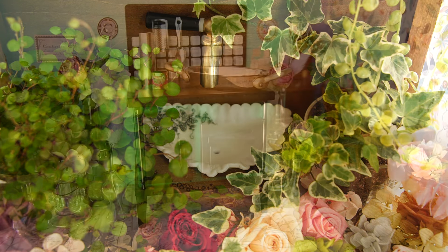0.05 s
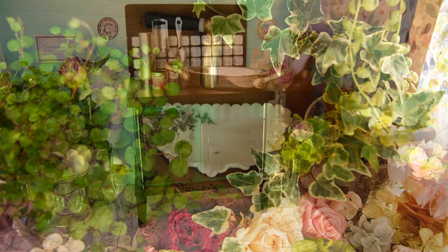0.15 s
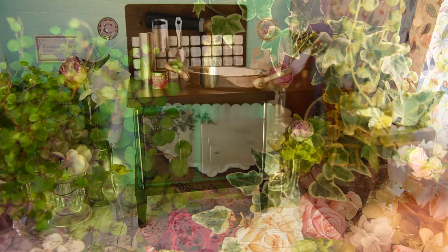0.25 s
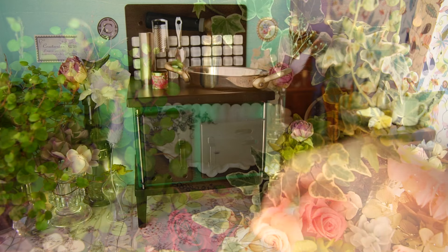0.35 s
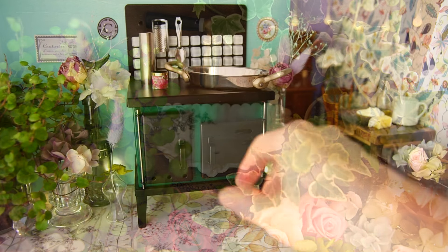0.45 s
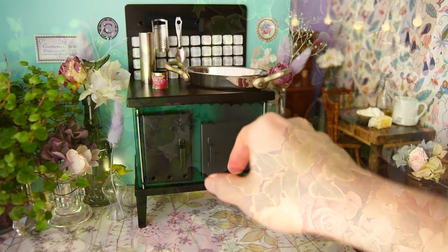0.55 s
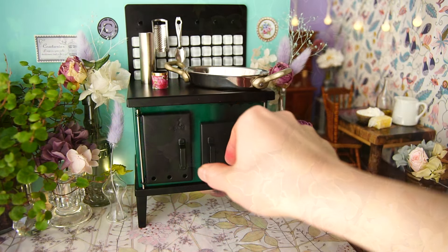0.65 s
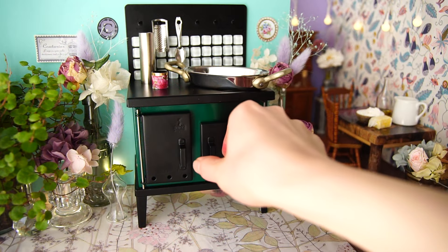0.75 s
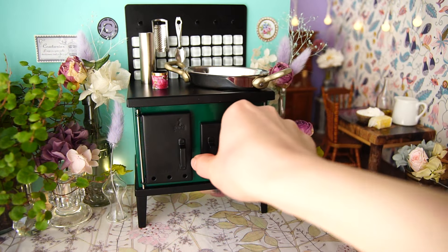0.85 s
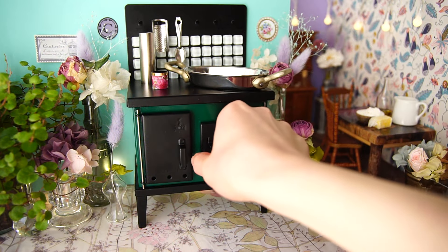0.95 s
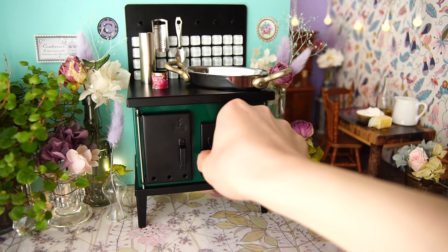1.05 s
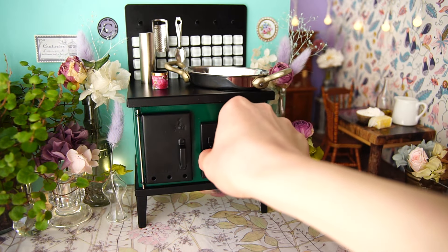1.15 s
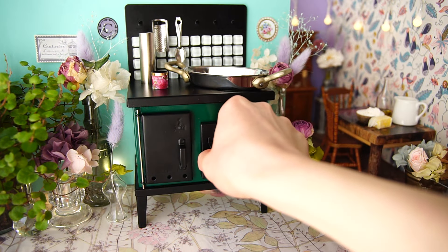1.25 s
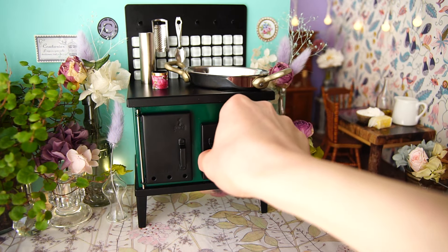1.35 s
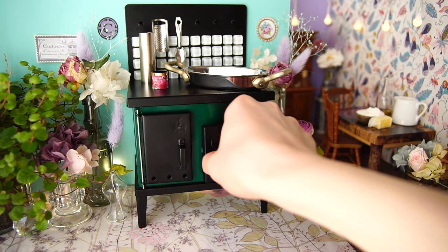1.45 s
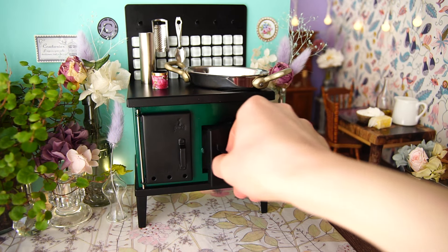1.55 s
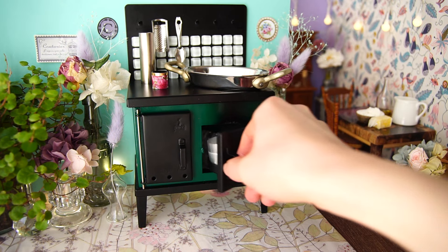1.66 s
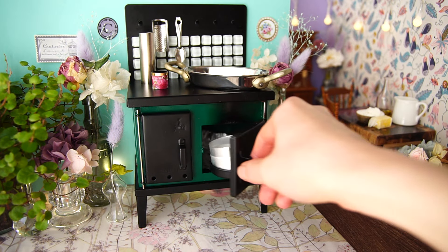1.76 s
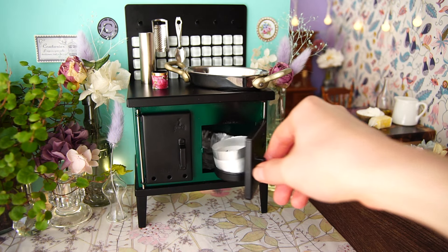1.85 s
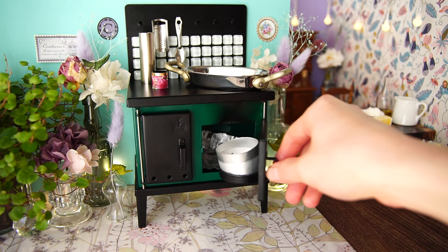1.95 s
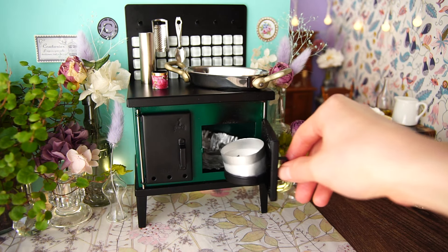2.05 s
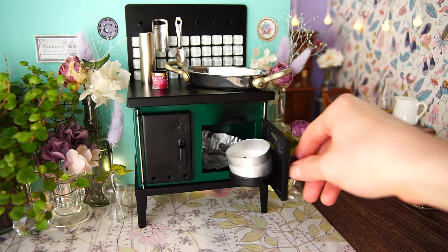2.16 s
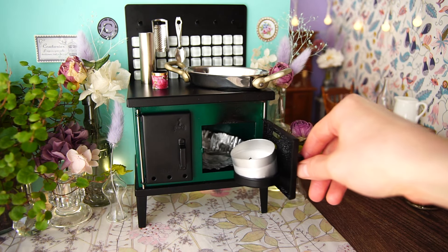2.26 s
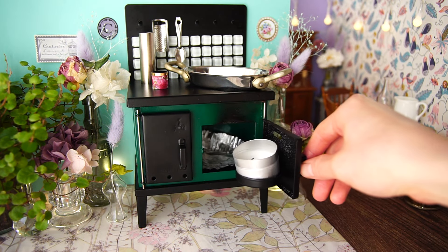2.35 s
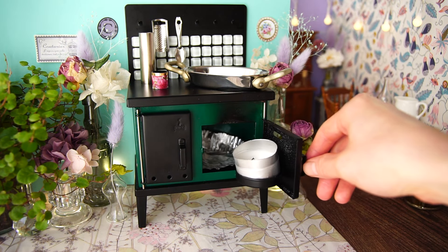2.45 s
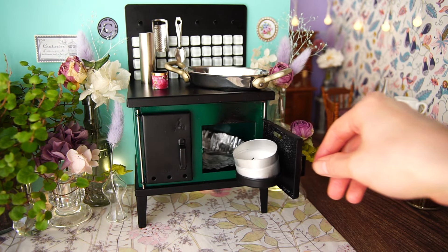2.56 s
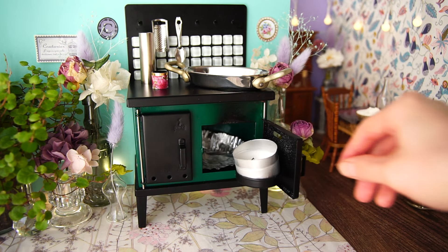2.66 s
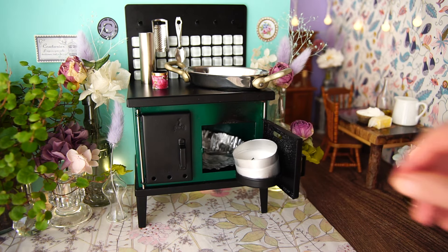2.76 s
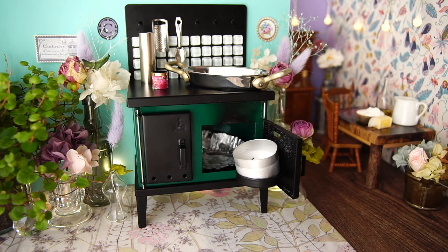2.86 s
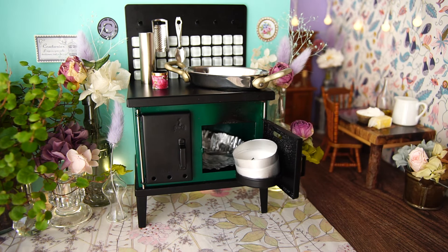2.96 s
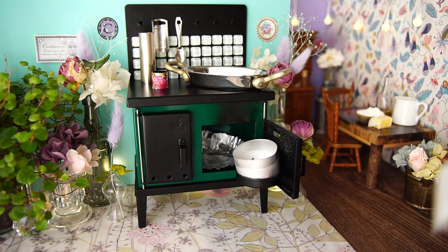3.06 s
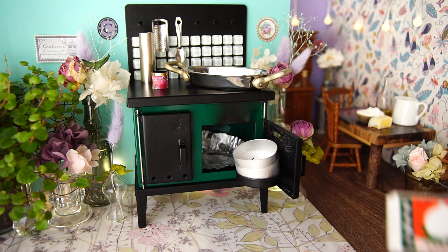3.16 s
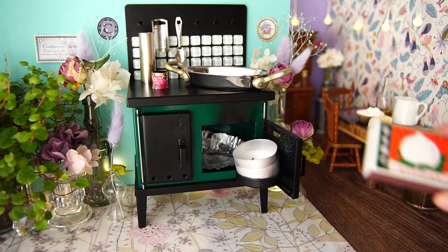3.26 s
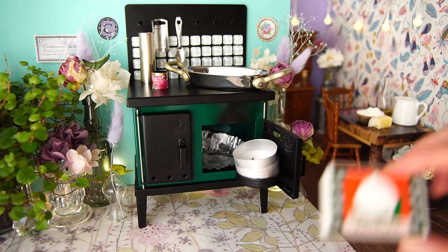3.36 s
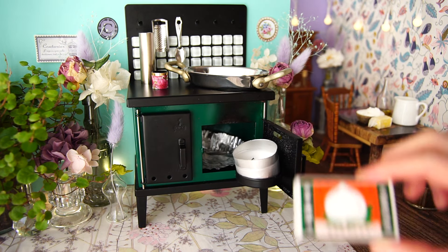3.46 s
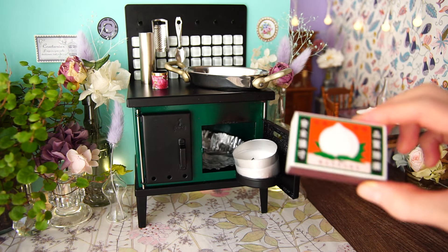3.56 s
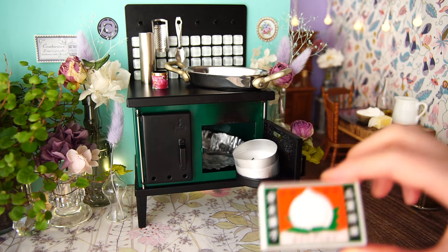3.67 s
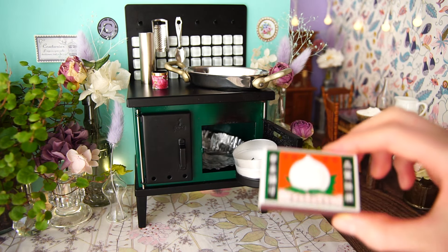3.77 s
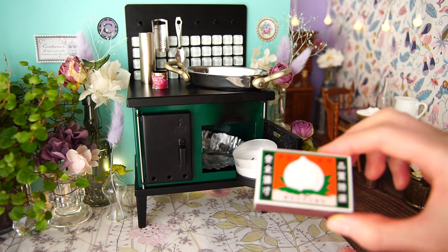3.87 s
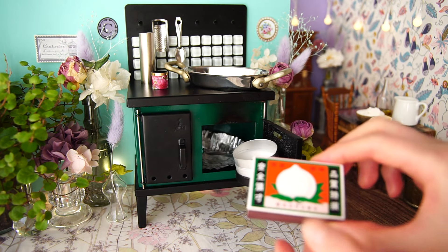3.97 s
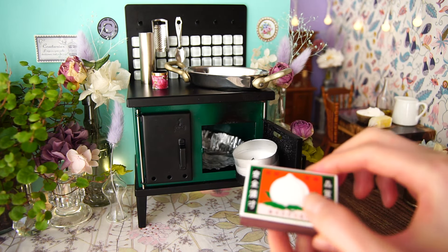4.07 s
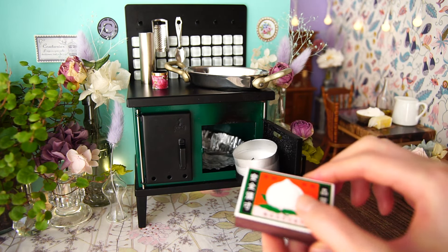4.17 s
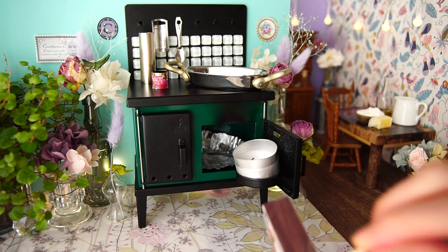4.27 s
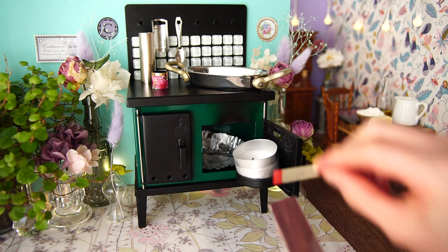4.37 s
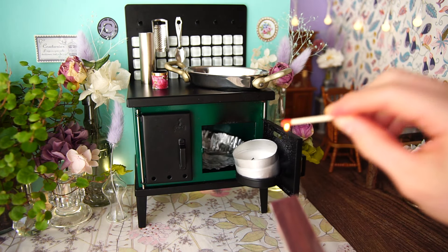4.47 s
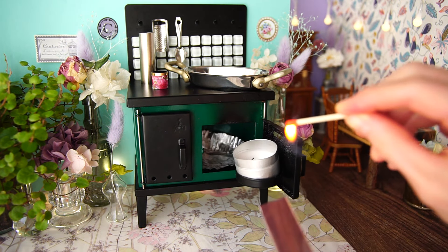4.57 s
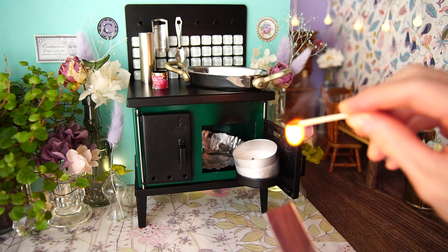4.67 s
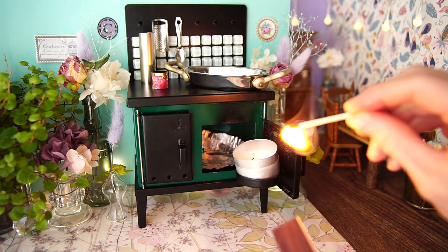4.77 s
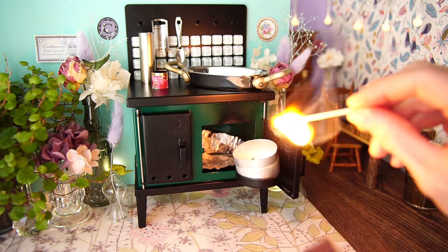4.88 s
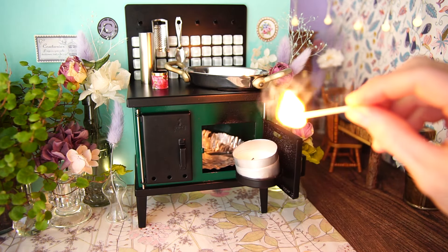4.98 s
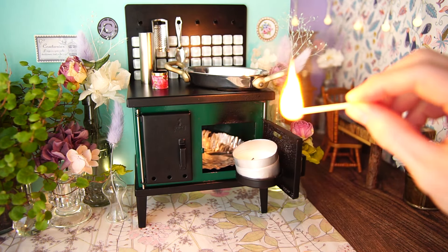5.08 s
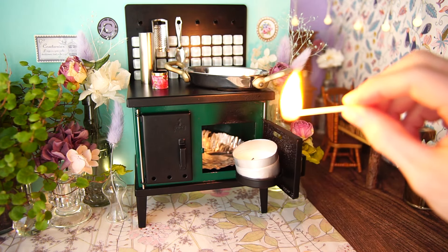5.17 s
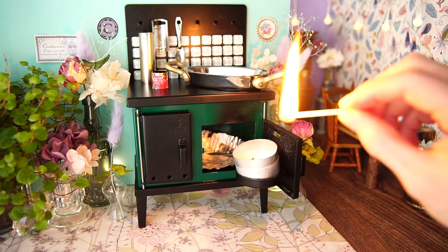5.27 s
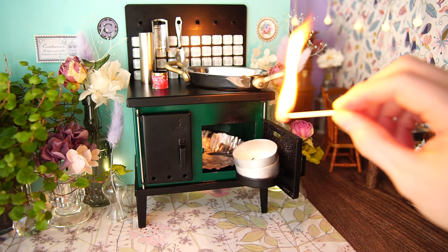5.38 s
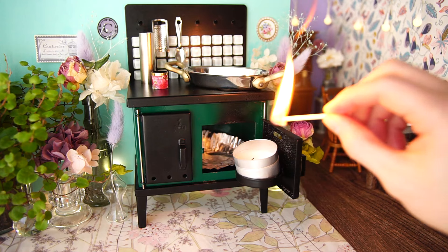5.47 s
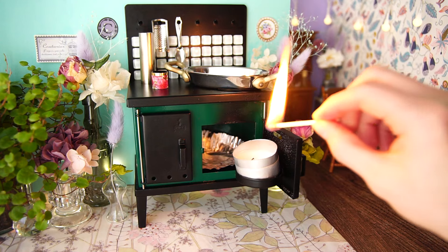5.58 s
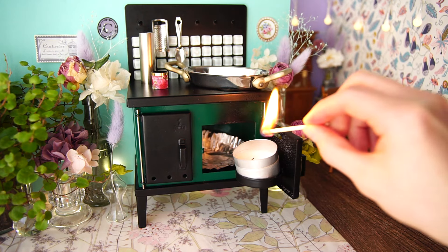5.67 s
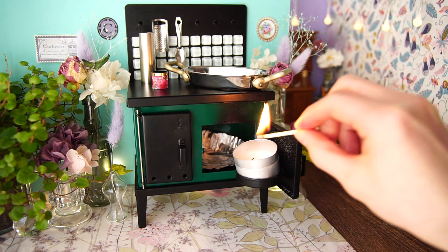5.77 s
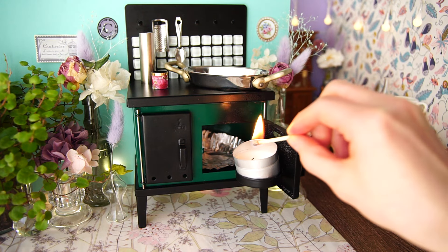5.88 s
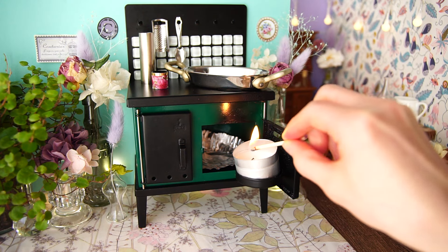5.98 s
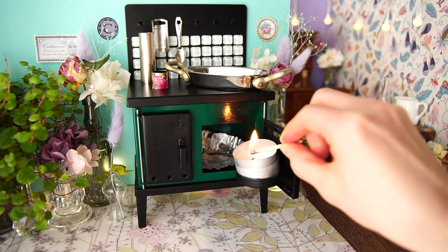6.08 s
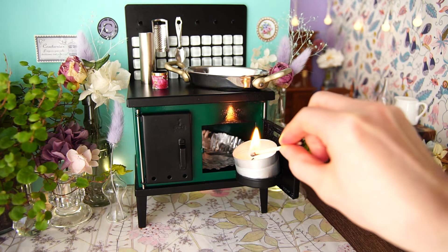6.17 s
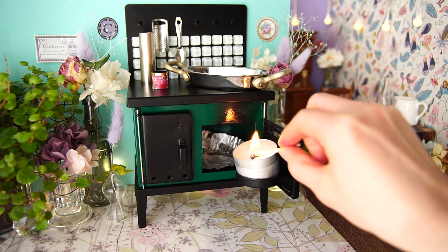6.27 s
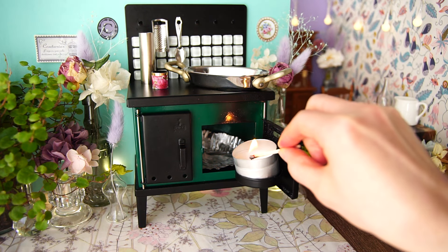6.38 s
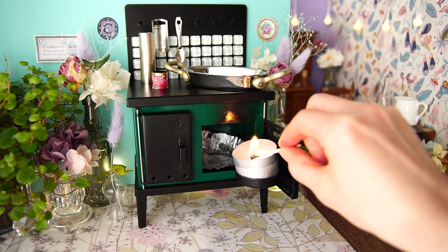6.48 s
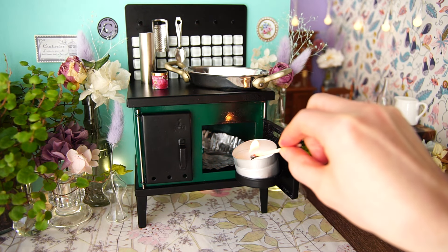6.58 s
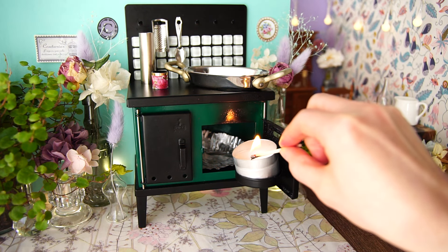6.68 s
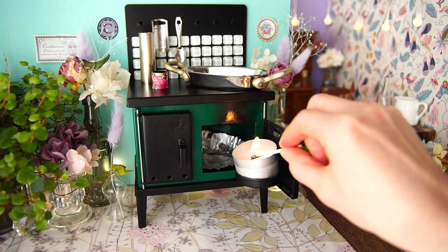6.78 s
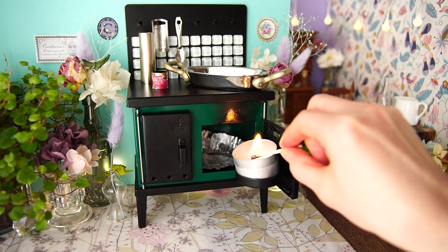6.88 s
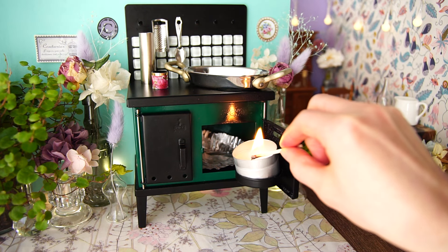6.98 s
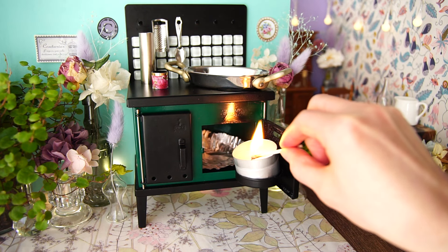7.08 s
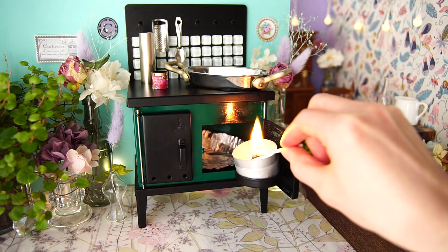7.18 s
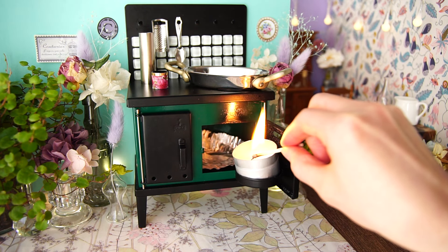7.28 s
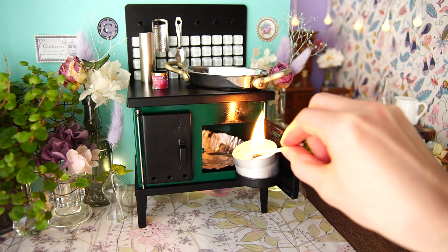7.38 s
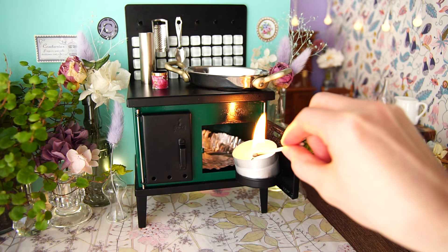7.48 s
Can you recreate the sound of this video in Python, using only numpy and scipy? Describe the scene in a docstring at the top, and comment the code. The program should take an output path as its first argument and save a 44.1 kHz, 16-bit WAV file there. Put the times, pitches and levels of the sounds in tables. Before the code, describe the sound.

A quiet room with a faint hum and hiss; everything happens close to the microphone. At about 0.8 seconds the latch of a miniature metal stove door knocks softly, with more small knocks and rubs around 1.4 and a barely audible hinge whisper near 2.4. From 3.1 to 3.7 a matchbox is shaken three times, sticks clattering brightly on cardboard, the loudest sound here. Around 4.3 a match scrapes along the box with a short, gritty squeak and a few stick clacks. It catches at 4.5 with a dull puff and a sputtering, fizzy hiss that swells until 4.9, pops several times and ends near 5.4. One more sharp pop follows at 5.5. The wood then burns with a very faint, thin sizzle until the end, about 7.6, with tiny spits and a few light ticks at a candle's tin cup between 6 and 6.5.

```python
"""Lighting a match at a toy stove

In a quiet room a hand unlatches the door of a miniature metal stove, which knocks and rubs.
A matchbox is shaken three times, its sticks clattering on the cardboard. One match squeaks along
the box and flares for a second as tiny gas jets sputter from its head. Then its wood burns with
a thin sizzle while it is lowered to a small candle in a tin cup."""
import sys
import numpy as np
from scipy import signal
from scipy.fft import rfft, irfft
from scipy.io import wavfile

SR = 44100
rng = np.random.default_rng(int(sys.argv[2]) if len(sys.argv) > 2 else 0)


def dump_mix(stems):
    """Bounce the given channels to the path in sys.argv[1] as a 16-bit WAV at rate SR."""
    frames = np.atleast_2d(stems).T  # one column per channel
    limited = np.clip(frames, -1, 1)  # hard clip at full scale
    pcm = np.round(limited * 32767).astype(np.int16)
    wavfile.write(sys.argv[1], SR, pcm)


N = 332098
TIME, HZ = np.arange(N) / SR, np.fft.rfftfreq(4096, 1 / SR)
TOP_HZ = 15830


def amp(db):
    """Turns decibels into a gain."""
    return 10 ** (np.asarray(db) / 20)


def unit(x):
    """Scales a sound to an average (rms) level of 1."""
    return x / np.sqrt(np.mean(x ** 2) + 1e-20)


def at_pitch(rows, hz):
    """Reads a table between its rows, on a log-frequency scale."""
    f, value = np.transpose(rows)
    return np.interp(np.log(hz + 1), np.log(f + 1), value)


def over_time(rows):
    """Joins rows of time and value with straight lines."""
    return np.interp(TIME, *np.transpose(rows))


def held(start, end, rise_s, fall_s):
    """Swells up to start, holds at 1 until end, then dies away."""
    return np.exp(-np.maximum(start - TIME, 0) / rise_s - np.maximum(TIME - end, 0) / fall_s)


def bump(s, width_s):
    """A smooth hill of height 1 around time s."""
    return np.exp(-.5 * ((TIME - s) / width_s) ** 2)


def add(mix, s, sound):
    """Mixes a sound in at time s."""
    part = mix[round(s * SR):][:len(sound)]
    part += sound[:len(part)]


def body(tone, resonances=()):
    """How an object answers one tap, given its overall tone and its resonances."""
    db = at_pitch(tone, HZ) + sum(d / (1 + (2 * (HZ - f) / w) ** 2) for f, w, d in resonances)
    log_gain = np.log(amp(np.r_[db, db[-2:0:-1]]))
    response = np.fft.ifft(np.exp(np.conj(signal.hilbert(log_gain)))).real  # rings only after the tap
    return response / np.linalg.norm(response)


def through(x, response):
    """Plays a sound through a body or a room."""
    return signal.oaconvolve(x, response)[:N]


def resonate(x, hz, width_hz):
    """Rings a sound at the pitch hz, which may move; level 1."""
    turn = np.exp(2j * np.pi * np.cumsum(hz * np.ones(N)) / SR)
    r = np.exp(-np.pi * width_hz / SR)
    return unit((turn * signal.lfilter([1], [1, -2 * r, r * r], x / turn)).real)


def noise():
    """White noise at level 1."""
    return rng.standard_normal(N)


def drift(hz):
    """A random wobble, up to about hz times a second."""
    return unit(irfft(rfft(noise()) * np.exp(-(np.fft.rfftfreq(N, 1 / SR) / hz) ** 2), N))


def grains(per_s, spread_db):
    """Tiny random impacts of uneven size."""
    size = amp(spread_db * np.minimum(rng.exponential(1, N), 3))
    return unit(size * np.sign(noise()) * (rng.random(N) < per_s / SR))


def blows(rows, response, share, scatter, linger):
    """Each blow rings at its own pitch and shakes a body; share sets how much body is heard."""
    out, t = np.zeros(N), np.arange(4096) / SR
    for (s, db, hz, ring_s), chance in zip(rows, rng.standard_normal((len(rows), len(t)))):
        ring = np.sin(2 * np.pi * hz * t) * amp(-60 * t / ring_s) * (1 - np.exp(-t * hz * 2))
        rattle = chance * amp(-60 * t / (linger * ring_s))  # tiny contacts after the blow
        force = (t == 0) + scatter * rattle / np.linalg.norm(rattle)
        shaken = signal.fftconvolve(force, response)[:len(t)]
        sound = ring / np.linalg.norm(ring) + share * shaken
        add(out, s, amp(db) * sound / abs(sound).max())
    return out


# The tone of the quiet room. Each row: frequency in Hz, level in dB.
AIR_TONE = [(15, -35.5), (25, -17), (76, 2), (114, -7), (157, -9), (285, -9), (405, -15.5), (531, -7.5),
            (624, -18), (714, -17), (1040, -20.5), (1650, -28), (12900, -33), (14000, -31), (16000, -32)]
# The notes of the hum. Each row: pitch in Hz, level in dB.
HUM_NOTES = [(86, -81.5), (167, -74), (210, -79), (538, -76.5), (587, -79.5), (13910, -88)]
def background():
    """Room rumble, hiss and a wavering hum; the level dips briefly at the start."""
    air = amp(-64) * through(noise(), body(AIR_TONE))
    hum = sum(amp(db) * np.sqrt(2) * np.sin(2 * np.pi * hz * TIME + .9 * drift(9))
              for hz, db in HUM_NOTES)
    dip_s = 0.22
    fade = np.maximum((dip_s - TIME) / 0.37, (TIME - dip_s) / 0.55)
    return (air + hum) * np.minimum(amp(-28) + fade, 1)


# The tone of the door. Each row: frequency in Hz, level in dB.
DOOR_TONE = [(60, -22), (280, -13), (750, -5), (1200, -14), (2500, -22.5), (6000, -34), (15000, -41)]
# Where the door rings. Each row: pitch in Hz, width in Hz, boost in dB.
DOOR_RINGS = [(290, 68, 13), (675, 98, 9.1), (1040, 260, 8.4), (1870, 140, 6.4), (3000, 160, 16),
              (3650, 77, 9), (4370, 190, 15), (5940, 260, 8.9), (7340, 180, 9.9)]
# The latch knocks. Each row: start in seconds, peak in dB, pitch in Hz, length in seconds.
LATCH_KNOCKS = [(.786, -38.5, 816, 0.013), (.792, -39, 735, 0.042), (.925, -65, 1210, 0.019),
                (1.163, -56, 1500, 0.014), (1.365, -47, 746, 0.038), (1.388, -58, 3690, .06),
                (1.396, -45, 700, 0.014), (1.404, -49, 393, 0.061)]
# The door rubs in its frame. Each row: start in seconds, length in seconds, level in dB.
DOOR_RUBS = [(0.796, .008, -53.5), (.845, 0.096, -61.5), (1.276, 0.051, -63.5), (1.38, 0.019, -59),
             (2.396, 0.046, -74)]
def stove_door():
    """The latch knocks and the door rubs, both ringing the same thin metal."""
    metal = body(DOOR_TONE, DOOR_RINGS)
    pressure = sum(amp(db) * held(s, s + length, 0.0034, 0.025) for s, length, db in DOOR_RUBS)
    rub = pressure * through(grains(1500, spread_db=1.5), metal)
    return rub + blows(LATCH_KNOCKS, metal, share=0.41, scatter=1.5, linger=2.2)


# Where the hinge rings. Each row: pitch in Hz, width in Hz, boost in dB.
HINGE_RINGS = [(2730, 150, 15), (4150, 160, 21), (5550, 370, 14), (6650, 150, 18), (8800, 180, 17),
               (9500, 500, 12)]
def hinge():
    """The hinge whispers louder as the door swings wide, then stops."""
    metal = body([(1500, -15), (3000, -1.5), (9000, -1), (16000, -10)], HINGE_RINGS)
    swing = amp(-71.5) * held(2.44, 2.44, rise_s=0.094, fall_s=.01)
    return swing * through(grains(900, spread_db=-1), metal)


def stick_ticks(per_s, spread_db, ring_s, count=24):
    """Many small sticks tick at random, each at its own pitch."""
    t = np.arange(512) / SR
    pitches = (np.arange(count) + rng.random(count)) * TOP_HZ / count
    rings = [np.sin(2 * np.pi * hz * t) * amp(-60 * t / ring_s) for hz in pitches]
    return unit(sum(through(grains(per_s / count, spread_db), ring) for ring in rings))


# The tones of the box and of sliding sticks. Each row: frequency in Hz, level in dB.
BOX_TONE = [(100, -57), (330, -37), (500, -17), (800, -3), (1500, 0.5), (2800, -1), (3800, -5.5),
            (5300, -5.5), (7200, -14), (10500, -15.5), (16000, -26.5)]
SLIDE_TONE = [(200, -27.5), (500, -5.5), (900, 2), (1500, 5), (2400, -3.5), (4000, -3.5), (5400, -5),
              (7500, -14), (10500, -10.5), (16000, -24)]
# Where the box rings, and its hollow note. Each row: pitch in Hz, width in Hz, boost in dB.
BOX_RINGS = [(700, 40, 4.5), (1074, 37, 1.4), (1480, 69, 5.5), (1700, 210, 7.6), (2136, 150, 3.4),
             (2780, 500, 3.1), (5400, 440, 2.9)]
HOLLOW_NOTE = [(1450, 240, 8.5)]
# The heap of sticks lands. Each row: time in seconds, relative level in dB, swell in seconds.
LANDINGS = [(3.134, -20.5, 0.012), (3.188, -44, 0.0069), (3.341, -23.5, 0.014), (3.42, -19, 0.0084),
            (3.488, -47.5, 0.0091), (3.643, -32, 0.019), (3.704, -20, 0.011), (4.2, -63, .0035),
            (4.395, -38, 0.0042)]
# Single sticks hit hard. Each row: start in seconds, peak in dB, pitch in Hz, length in seconds.
STICK_CLACKS = [(3.0713, -16.5, 2920, 0.0046), (3.1188, -11, 2920, .0088), (3.2893, -35, 2100, 0.013),
                (3.3425, -11.5, 3040, 0.008), (3.412, -15.5, 2340, 0.0089), (3.481, -33, 1540, .008),
                (3.6153, -28, 2410, 0.0027), (3.6353, -16, 3040, 0.0044), (3.6505, -19.5, 3050, 0.0031),
                (3.6645, -24.5, 1700, 0.0053), (3.6995, -12.5, 2647, .0053), (3.718, -15, 1430, 0.011),
                (4.1893, -43, 1590, .011), (4.3098, -21.5, 2700, .008), (4.3887, -16, 4400, 0.0042),
                (4.3897, -21, 753, 0.034), (4.4112, -17.5, 1790, .006), (4.42, -24.5, 1660, 0.015),
                (4.452, -23.5, 1900, .008), (4.4594, -29.5, 4100, 0.022)]
def matchbox():
    """Sticks slide with a bright rustle, clatter onto the cardboard, and a few keep shifting."""
    box = body(BOX_TONE, BOX_RINGS)
    sliding, landing, shifting = np.zeros((3, N))
    for s, db, swell_s in LANDINGS:
        level = amp(db) * held(s, s, swell_s, fall_s=0.01)
        landed = np.clip((TIME - s) / 0.014 + 1, 0, 1)
        sliding += level * (1 - 0.68 * landed)
        landing += level * landed
        shifting += amp(db - 29.5) * held(s, s, swell_s, fall_s=0.05)
    ticks = through(stick_ticks(7000, spread_db=3, ring_s=0.0079), body(SLIDE_TONE))
    rustle = amp(-4.5) * (sliding + 0.45 * shifting) * ticks
    clatter = amp(-2.5) * landing * through(grains(1400, spread_db=4.5), box)
    stragglers = shifting * through(grains(1100, spread_db=5), body(BOX_TONE, BOX_RINGS + HOLLOW_NOTE))
    clacks = blows(STICK_CLACKS, box, share=0.66, scatter=1.4, linger=3.94)
    return rustle + clatter + stragglers + clacks


# The tone of the striking strip. Each row: frequency in Hz, level in dB.
GRIT_TONE = [(200, -22), (600, -15), (860, 0.5), (1250, -11.5), (2100, -1), (3500, 2), (4900, -4.5),
             (6700, -3.5), (9000, -8), (12000, -14), (16000, -13)]
# The box wall rings under the strip. Each row: pitch in Hz, width in Hz, boost in dB.
WALL_RING = [(1530, 240, 8.5)]
# The pitch of the squeak. Each row: time in seconds, slips per second.
SLIP_RATES = [(4.337, 4000), (4.347, 4300), (4.361, 4700), (4.367, 3500), (4.375, 2900)]
def strike():
    """The match head tears over the grit, sticking and slipping fast enough to squeak."""
    touch_s, start, end = 4.31, 4.3352, 4.381
    bite_s, lift_s = 0.0011, .004
    resting = amp(-54) * held(touch_s, start, bite_s, lift_s)
    stroke = held(start, end, bite_s, lift_s)
    stroke_db = -31.5 + 160.5 * (np.clip(TIME, start, end) - start)  # louder as the head speeds up
    strip = through(grains(6000, spread_db=1), body(GRIT_TONE, WALL_RING))
    grit = (resting + amp(stroke_db) * stroke) * strip
    grip = held(start, start + 0.023, bite_s, fall_s=0.016)
    jitter = 0.044 + 0.28 * (1 - grip)  # the squeak turns ragged as the head crumbles
    slip_hz = over_time(SLIP_RATES) * (1 + jitter * drift(921))
    phase = 2 * np.pi * np.cumsum(slip_hz) / SR
    squeak = unit(np.sin(phase) + 0.051 * np.sin(2 * phase)) * (1 + 0.56 * drift(310))
    scrape = grit + amp(-27) * stroke * grip * squeak
    table_echo = -0.3 * np.interp(TIME - .00286, TIME, scrape)
    return scrape + table_echo


# How much farther the echo travels as the match moves. Each row: time in seconds, path in metres.
ECHO_DETOUR = [(4.45, 0.21), (4.6, .222), (4.9, 0.19), (5.1, 0.33), (5.25, 0.3), (5.38, 0.17)]
# Echoes off the stove's faces. Each row: multiple of that path, gain.
FACE_ECHOES = [(1, .38), (2.3, -.3), (3.1, .3)]
def stove_echoes(x):
    """The stove's small faces reflect only treble; the shifting echoes make it swirl."""
    treble = signal.sosfiltfilt(signal.butter(3, 5200, "high", fs=SR, output="sos"), x)
    delay = over_time(ECHO_DETOUR) / 343  # sound travels 343 metres a second
    return sum(gain * np.interp(TIME - k * delay, TIME, treble) for k, gain in FACE_ECHOES)


FLARE_START, FLARE_PEAK, FLARE_END = 4.43, 4.921, 5.378  # seconds
# The flare's middle, high and low tones. Each row: frequency in Hz, level in dB.
HISS_TONE = [(250, -13.5), (450, -4), (800, 0), (2000, -1.5), (4500, -0.5), (6500, -6), (9000, -17),
             (16000, -27)]
FIZZ_TONE = [(3000, -38), (7000, 3.5), (9000, -0.5), (12000, -2.5), (16000, -9.5)]
ROAR_TONE = [(20, -14), (60, 1.5), (130, 1), (230, 3), (450, -6), (650, -5.5), (2000, -35.5)]
# Stove and table colour the sound. Each row: pitch in Hz, width in Hz, boost or cut in dB.
NOOK_COLOUR = [(460, 98, 10), (573, 63, -10), (878, 210, 6.5), (975, 57, -14), (1402, 77, 8),
               (1555, 110, -5), (2130, 430, 6), (2400, 165, -11), (2875, 150, 7), (3255, 120, 5),
               (3470, 140, -1), (4120, 320, 8), (4400, 160, -10), (4740, 190, 8.5)]
# Fresh pockets of the head catch. Each row: time in seconds, boost in dB, half length in seconds.
HEAD_SPURTS = [(4.543, 5, 0.012), (4.625, 8, 0.01), (4.656, 4.5, 0.014), (4.896, 2.5, 0.0091),
               (5.285, 5.5, 0.01)]
def flare():
    """Countless tiny gas jets burst from the head over a soft roar, until it is spent."""
    from_peak_s = np.clip(TIME, FLARE_START, FLARE_END) - FLARE_PEAK
    vigour_db = np.minimum(21 * from_peak_s, -13.5 * from_peak_s)  # grows, then wanes
    spurt_db = sum(db * bump(s, width_s) for s, db, width_s in HEAD_SPURTS)
    jets_db = vigour_db + 1.36 * drift(70.4)  # the jets sputter
    hiss_db = -43.5 + jets_db + spurt_db
    fizz_db = -55 + jets_db + 1.1 * spurt_db - 7.5 * from_peak_s  # less fizz as the head chars
    hiss = amp(hiss_db) * through(grains(9000, spread_db=4), body(HISS_TONE, NOOK_COLOUR))
    fizz = amp(fizz_db) * through(grains(7000, spread_db=6), body(FIZZ_TONE))
    roar = amp(-53.5 + 0.47 * vigour_db) * through(noise(), body(ROAR_TONE, NOOK_COLOUR))
    fade_in = np.clip((TIME - FLARE_START) / 0.021, 0, 1)
    fade_out = np.clip((FLARE_END - TIME) / 0.0055 + .5, 0, 1)
    return (hiss + fizz + roar + stove_echoes(hiss + fizz)) * fade_in * fade_out


# Puffs of gas. Each row: start in seconds, peak in dB, pitch in Hz, length in seconds.
GAS_PUFFS = [(4.479, -32, 507, 0.0099), (5.513, -46, 168.6, 0.016)]
def puffs():
    """Gas escapes in short, dull puffs."""
    return blows(GAS_PUFFS, body(ROAR_TONE, NOOK_COLOUR), share=0.76, scatter=.8, linger=2)


# Pops of the head. Each row: start in seconds, peak in dB, pitch in Hz.
HEAD_POPS = [(4.989, -30, 2500), (5.0388, -24, 3000), (5.049, -21.5, 2600), (5.078, -27, 2400),
             (5.207, -29.5, 3000), (5.3, -29.5, 1970), (5.5113, -26, 6250)]
def pops(cycles=4.9):
    """The burning head pops, ringing for a few cycles each time."""
    rows = [(s, db, hz, cycles / hz) for s, db, hz in HEAD_POPS]
    return blows(rows, body(HISS_TONE, NOOK_COLOUR), share=1, scatter=0.44, linger=2)


# The tone of the spent head. Each row: frequency in Hz, level in dB.
EMBER_TONE = [(250, -10.5), (800, -1), (4300, 1), (8000, -5), (16000, -16)]
def embers():
    """The spent head hisses on faintly for a moment."""
    glow = amp(-62) * held(FLARE_END, FLARE_END, rise_s=.01, fall_s=0.13)
    return glow * through(grains(9000, spread_db=3.5), body(EMBER_TONE, NOOK_COLOUR))


# The tone of burning wood. Each row: frequency in Hz, level in dB.
WOOD_TONE = [(500, -19), (1300, -14), (1700, 1.5), (2300, -8), (4500, -7.5), (6500, -8), (9000, -10),
             (13000, -13), (16000, -12)]
# The open oven colours the sound. Each row: pitch in Hz, width in Hz, boost or cut in dB.
OVEN_COLOUR = [(3700, 300, -4), (4110, 160, 4), (4750, 120, 3), (5250, 150, 3), (5900, 400, -3),
               (6550, 170, 5), (7260, 170, 3), (9400, 500, -3)]
# The gaps between hand, flame and stove ring.
# Each row: pitch in Hz with the match raised, pitch in Hz once lowered, width in Hz, level in dB.
AIR_GAPS = [(3530, 6100, 1600, -5.5), (5500, 7560, 1000, -12.5), (7100, 11150, 1900, -11)]
def flame():
    """Wood sizzles; its hollow colour rises as the match is lowered and the gaps close."""
    lower_start, lower_end, reach_cup_s = 5.4, 6.44, 6.0
    progress = np.clip((TIME - lower_start) / (lower_end - lower_start), 0, 1)
    lowered = np.sin(np.pi / 2 * progress) ** 2
    over_cup = np.clip((TIME - reach_cup_s) / 0.19 + .5, 0, 1)
    jets = through(grains(9000, spread_db=4.5), body([(20, 0), (16000, 0)], OVEN_COLOUR))
    low, middle, high = (amp(db) * resonate(jets, start_hz + (end_hz - start_hz) * lowered, width)
                         for start_hz, end_hz, width, db in AIR_GAPS)
    gaps = low * (1 - 0.72 * over_cup) + middle + high
    cup = amp(-4.5) * over_cup * resonate(jets, hz=3090, width_hz=1000)  # the candle's cup sings along
    wood = amp(-4.5) * through(grains(9000, spread_db=5.5), body(WOOD_TONE, OVEN_COLOUR))
    caught = 1 - np.exp(-np.maximum(TIME - FLARE_END, 0) / 0.17)  # the flame takes hold
    return caught * amp(-65.5 - 1.5 * over_cup) * (wood + gaps + cup)


# Spits of the flame. Each row: time in seconds, level in dB, half length in seconds.
FLAME_SPITS = [(5.487, -55.5, .002), (5.5111, -44.5, 0.0017), (6.335, -60.5, 0.0064), (6.408, -60, 0.0078),
               (6.45, -63.5, 0.012), (6.817, -72, 0.031), (7.148, -63, 0.02), (7.322, -65, 0.0082)]
def spits():
    """Head and wick spit in brief bursts of fine crackle."""
    level = sum(amp(db) * bump(s, width_s) for s, db, width_s in FLAME_SPITS)
    tone = body([(600, 1.5), (3000, 3.5), (8000, 0), (16000, -9)])
    return level * through(grains(3000, spread_db=1), tone)


# Ticks at the wick. Each row: start in seconds, peak in dB.
TICK_TIMES = [(6.006, -43.5), (6.367, -36), (6.4122, -37)]
# The tone of those ticks. Each row: frequency in Hz, level in dB.
WICK_TONE = [(300, -4), (1000, -6.5), (1900, -3), (2400, -8), (3100, 2), (4200, -10.5), (8000, -17.5),
             (16000, -29)]
def wick_ticks(hz=3000, ring_s=0.0071):
    """The flame ticks inside the candle's cup, which rings briefly."""
    rows = [(s, db, hz, ring_s) for s, db in TICK_TIMES]
    return blows(rows, body(WICK_TONE), share=1.7, scatter=.7, linger=2.2)


# Touches on the cup. Each row: start in seconds, peak in dB, pitch in Hz, length in seconds.
TIN_TOUCHES = [(6.33, -58, 1190, .15), (6.447, -56, 1225, 0.21)]
def candle_cup():
    """The match brushes the cup, and the thin tin rings faintly."""
    return blows(TIN_TOUCHES, body(WOOD_TONE), share=0.18, scatter=.5, linger=.2)


# How long the room rings. Each row: frequency in Hz, seconds to fade by 60 dB.
ROOM_DECAY = [(150, 0.79), (1000, 0.3), (4000, 0.25), (14000, 0.11)]
# Echoes off the table top and the stove. Each row: delay in seconds, gain.
NEAR_ECHOES = [(.0024, 0.013), (.0041, -0.018), (.0073, .1), (0.0102, 0.031)]
def room(x):
    """A few close echoes and a faint tail whose treble dies first."""
    hz, t, spectrum = signal.stft(rng.standard_normal(SR // 2), SR, nperseg=256)
    decay = amp(-60 * t / at_pitch(ROOM_DECAY, hz)[:, None])
    tail = signal.istft(spectrum * decay, SR, nperseg=256)[1]
    tail *= np.clip(np.arange(len(tail)) / SR / 0.00477, 0, 1)
    tail *= amp(-18.5) / np.linalg.norm(tail)
    for delay, gain in NEAR_ECHOES:
        add(tail, delay, [gain])
    return through(x, tail)


def scene():
    """Everything happens close by, so the room stays faint."""
    near = stove_door() + hinge() + matchbox() + strike()
    near += flare() + puffs() + pops() + embers() + flame() + spits() + wick_ticks() + candle_cup()
    return (near + room(near) + background())[None]


def record(dry):
    """Cuts the treble above TOP_HZ."""
    lowpass = signal.firwin(511, TOP_HZ, window=("kaiser", 9), fs=SR)
    return signal.oaconvolve(dry, lowpass[None], "same")


dry = scene()
out = record(dry)
dump_mix(out)
```